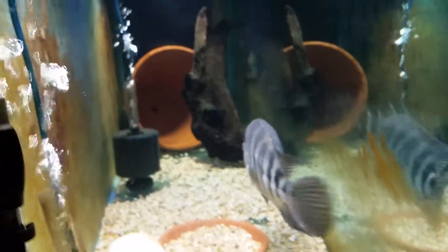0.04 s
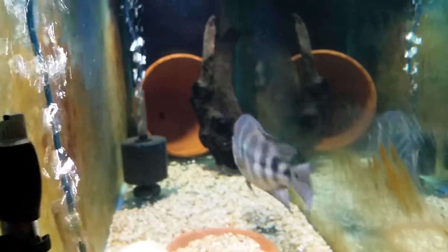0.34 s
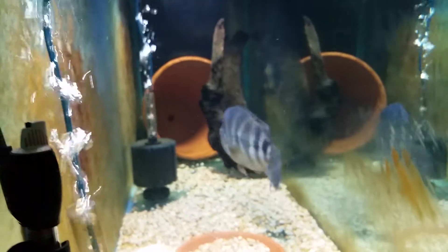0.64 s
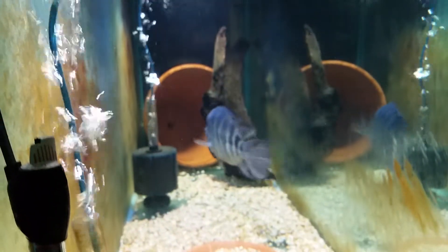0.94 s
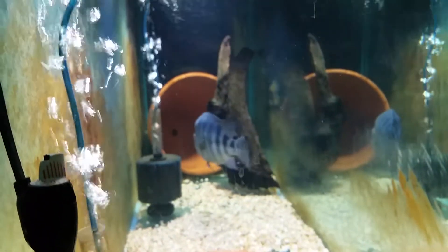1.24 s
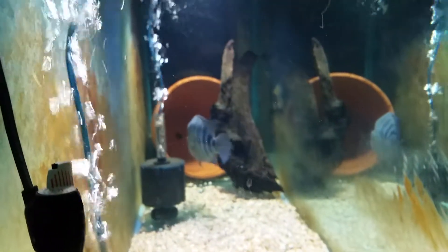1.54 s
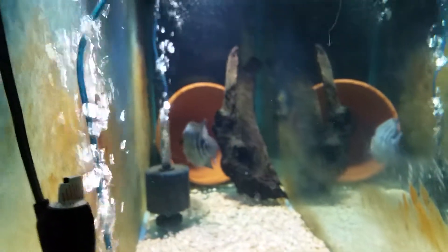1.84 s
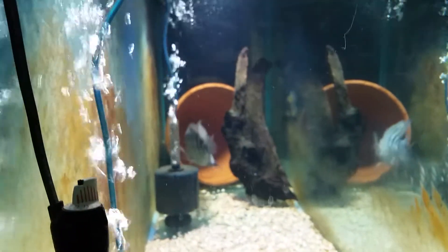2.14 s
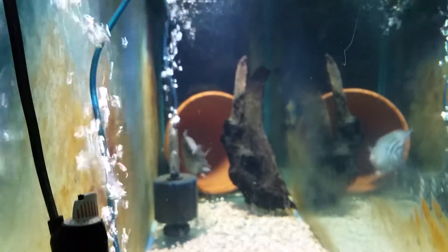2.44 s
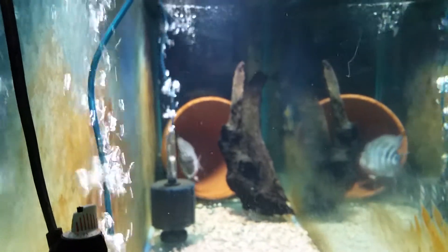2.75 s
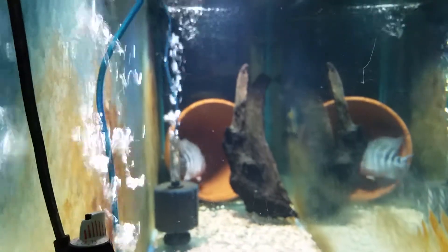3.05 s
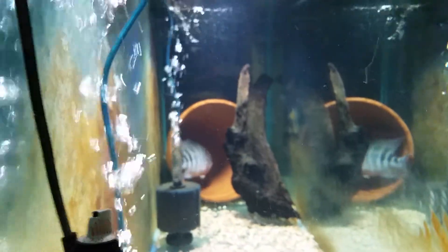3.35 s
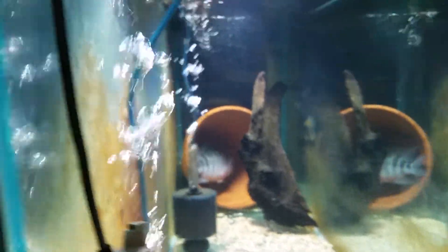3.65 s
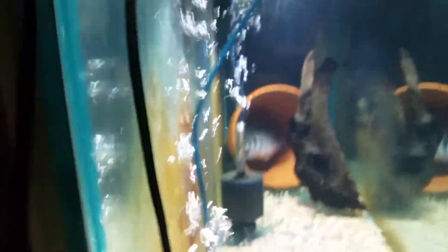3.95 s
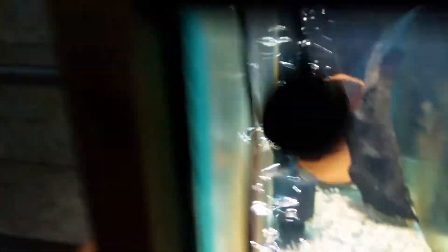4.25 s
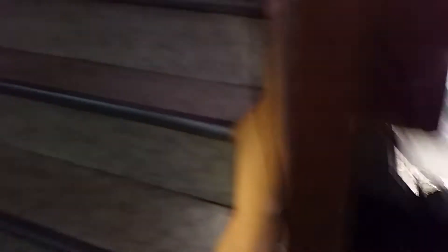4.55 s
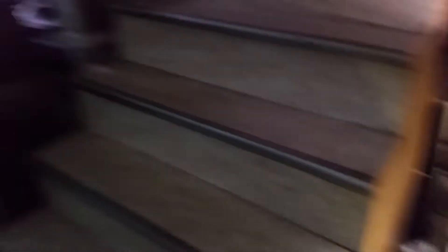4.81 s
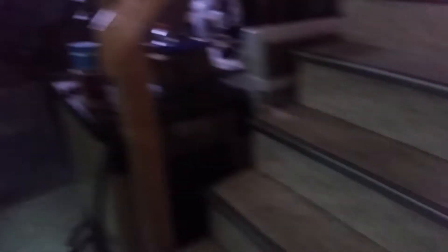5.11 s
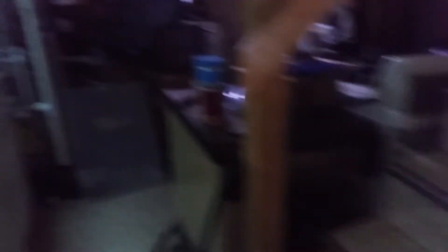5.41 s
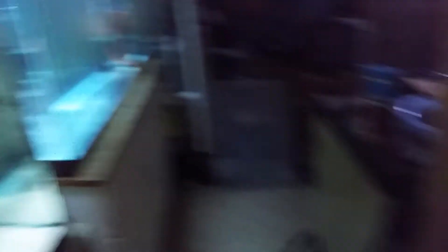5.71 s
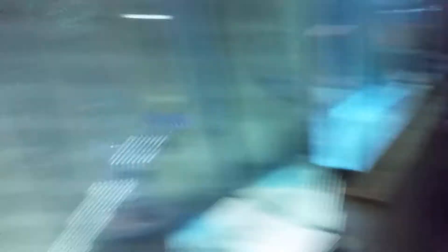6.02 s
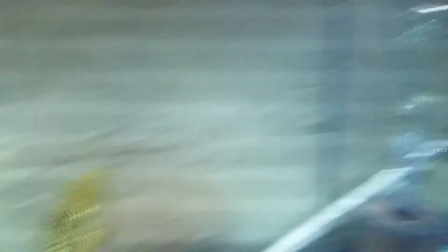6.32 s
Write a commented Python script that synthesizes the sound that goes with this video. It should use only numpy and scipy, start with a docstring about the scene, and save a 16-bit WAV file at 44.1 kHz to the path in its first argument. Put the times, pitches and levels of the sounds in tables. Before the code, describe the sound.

Bubbles gurgle and rumble in aquariums over humming air pumps, with wind puffs on the microphone and light handling noise.

```python
"""Bubbles rise through aquariums in a fish room, ringing as they burst and making the tanks rumble.
Diaphragm air pumps hum at the mains rate, over a soft hiss of air and filters.
A hand-held microphone stands by one tank, where a draught buffets it, then turns into the aisle.
Fingers tick and rub on its case, and near the end the hand slides to a new grip."""
import sys
import numpy as np
from scipy import signal
from scipy.fft import rfft, irfft
from scipy.io import wavfile
from scipy.ndimage import map_coordinates

SR = 44100
rng = np.random.default_rng(int(sys.argv[2]) if len(sys.argv) > 2 else 0)


def master_out(mix):
    """Clip the mix to full scale and print it as 16-bit PCM to the path in sys.argv[1]."""
    frames = np.transpose(np.atleast_2d(mix))
    ceiling = np.clip(frames, -1, 1)
    pcm = np.round(ceiling * 32767).astype(np.int16)
    wavfile.write(sys.argv[1], SR, pcm)


N = 285470
T = np.arange(N) / SR
FREQS = np.maximum(np.arange(N // 2 + 1) * SR / N, 1)
MAINS_HZ = 60

# Levels are in decibels; most tables set how loud each sound is, and some functions add a gain.
# the microphone's turn: time_s, aisle_share (0 at the tank, 1 in the aisle)
TURN = [(0, 0), (1.8, 0.02), (3.85, 0), (4.25, 0.45), (5.2, 1), (6.47, 0.73)]

# tone of the air and filter hiss: pitch_hz, left_db, right_db
HISS_COLOUR = [(740, -93, -81), (950, -87, -78.5), (2010, -90, -81), (2294, -93.5, -89.5),
               (2640, -104.0, -103.0), (3410, -103.4, -105.6), (3796, -86.5, -101.3), (4240, -90.5, -102.5),
               (4700, -104.0, -107.9), (5760, -125.0, -121.6), (7400, -130.0, -129.6),
               (9550, -134.4, -134.3), (11970, -115.6, -116.1), (15200, -110.3, -108.6)]
# the hiss dips a little in the aisle: time_s, level_db
HISS_LEVEL = [(0, 0.4), (2, 0.13), (4.4, 0.63), (5.2, 0.2), (5.75, -1.6), (6.05, -0.3), (6.47, 0.4)]
# the draught, strongest by the tank: time_s, left_db, right_db
DRAUGHT_LEVEL = [(0, -40.5, -40), (1.5, -41, -43), (2.5, -38.5, -36.5), (2.8, -36, -30), (3.7, -40, -32),
                 (4.1, -36, -38.5), (4.4, -49.5, -55.5), (6.47, -48.5, -54)]
# tone of its swirling air: pitch_hz, level_db
DRAUGHT_COLOUR = [(10, -26.5), (25, -9.5), (45, -1), (70, 2), (110, 0), (170, -6), (250, -17), (400, -29),
                  (800, -51), (3000, -100)]
# puffs of air hit the microphone: middle_s, length_s, left_db, right_db
PUFFS = [(0.323, 0.04, -30.5, -29), (0.45, 0.047, -27, -34), (0.775, 0.046, -32.5, -22),
         (0.835, 0.04, -29.5, -32.5), (1.07, 0.037, -30, -38), (1.395, 0.075, -36, -24.5),
         (1.655, 0.055, -42, -24), (1.795, 0.091, -36, -22), (1.92, 0.035, -22.5, -28),
         (2.054, 0.071, -38, -23.5), (2.225, 0.067, -35, -25), (2.502, 0.034, -32, -30),
         (2.762, 0.04, -29, -25.5), (2.83, 0.038, -40, -19.5), (2.998, 0.025, -35, -22),
         (3.12, 0.063, -39.5, -24), (3.213, 0.06, -34.5, -16), (3.296, 0.037, -25, -22.5),
         (3.452, 0.05, -38.5, -24.5), (3.392, 0.036, -42, -21.5), (3.599, 0.035, -40, -14),
         (3.838, 0.061, -24.5, -19), (4.037, 0.032, -40, -29)]

# fingers tick on the case: middle_s, level_db, half_width_s
TICKS = [(4.1026, -13, .00031), (4.807, -17.2, .00029), (5.3375, -11, .00031), (6.2868, -18.5, .0003)]
# the case creaks faintly: start_s, level_db
CREAKS = [(4.807, -46), (4.821, -50), (5.228, -45), (5.232, -41), (5.236, -44), (6.288, -36)]
# a finger rubs the case: start_s, length_s, level_db
RUB = (3.835, 0.022, -32.5)
# the hand slides to a new grip: start_s, length_s
SLIDE = (6.05, 0.24)
# a high, airy sound in mid-slide: middle_s, half_width_s
SHEEN = (6.13, 0.13)
# tones of the rub and of the slide's scrape, swish and sheen: pitch_hz, level_db
RUB_COLOUR = [(40, 3), (120, 0), (500, -3), (1000, -12), (1500, -17), (2100, -16), (2700, -23),
              (3700, -16.5), (4400, -19), (5400, -54), (9000, -68)]
SCRAPE_COLOUR = [(200, 5.5), (600, 5.5), (900, -4), (1350, 0.5), (1700, -2), (2200, -0.5), (2900, -27),
                 (4000, -17), (5600, -60), (9000, -76)]
SWISH_COLOUR = [(200, -20), (600, -2), (2300, -2), (3050, -4), (3500, 1), (4200, -1), (5500, -20),
                (7000, -27), (9500, -30), (11200, -21), (15000, -20)]
SHEEN_COLOUR = [(9800, -30), (11200, -3), (14300, 0), (15500, -2)]
# the sliding skin catches on the case: start_s, level_db
CATCHES = [(6.026, -36), (6.092, -36)]
# the skin squeaks as the slide ends: start_s, length_s, pitch_hz, width_hz
SQUEAK = (6.13, .13, 2760, 300)
# the hand bumps the case: start_s, level_db
BUMPS = [(5.338, -35), (6.031, -19.5), (6.144, -32)]
# the bumped case sways in the hand: pitch_hz, level_db, ring_cycles
BUMP_TONES = [(52.5, 2.5, 16), (135, -4.5, 11), (212, -3.5, 23)]

# tones of the pumps: mains_multiple, tank_left_db, tank_right_db, aisle_left_db, aisle_right_db
HUM_TONES = [(1, -48.0, -49.0, -51.0, -46.0), (2, -46.0, -42.7, -43.8, -39.8),
             (3, -43.0, -39.5, -47.0, -42.0), (4, -57.0, -50.0, -60.0, -52.0),
             (5, -59.0, -55.0, -54.0, -50.0), (6, -51.3, -46.5, -59.0, -52.0),
             (7, -68.0, -55.0, -66.0, -63.0), (9, -70.0, -58.0, -65.0, -60.0),
             (10, -65.0, -63.0, -60.5, -54.7), (11, -66.0, -62.0, -73.0, -64.0),
             (12, -68.0, -61.0, -76.0, -67.0), (13, -65.0, -71.0, -77.0, -71.0),
             (14, -68.0, -62.0, -74.0, -75.0), (17, -66.0, -61.5, -74.0, -63.5),
             (23, -74.0, -61.0, -80.0, -72.0), (26, -84.0, -72.0, -82.0, -69.0),
             (29, -75.0, -66.5, -80.0, -75.0)]
# loud and quiet spots the microphone crosses: mains_multiple, middle_s, half_width_s, change_db
HUM_SPOTS = [(1, 6.1, .65, -12), (2, 6.05, .6, -11), (3, 0.55, .2, 2), (3, 3.35, .25, 3),
             (3, 6.15, .55, -8), (4, 6.1, .65, -6), (6, 0.42, .08, 4), (6, 0.97, .09, 6), (6, 2.05, .1, 3),
             (6, 4.6, .2, -12), (6, 6.05, .4, 4), (10, 4.0, .08, -10), (10, 4.32, .2, 6.5),
             (10, 4.8, .18, 3), (10, 5.07, .1, -11), (10, 5.65, .27, 3.5), (10, 6.1, .1, -4),
             (10, 6.35, .12, 2.5), (17, 4.42, .12, 6), (17, 5.0, .45, -4), (17, 5.95, .3, 5.5),
             (23, 4.3, .35, -5), (23, 5.5, .17, 14)]

# tones at which the tanks and room ring: pitch_hz, width_hz, tank_db, aisle_db
TANK_TONES = [(69, 18, -46, -45.5), (107.8, 14, -46, -44.5), (129.2, 35, -46, -43), (168.2, 31.3, -44, -49),
              (224, 66, -47, -49), (266.4, 37.3, -43.5, -50), (294.1, 38, -47, -48), (350, 81, -49, -50),
              (404.6, 14, -51, -55.5), (447.5, 89, -57, -54), (476.4, 30, -61, -65), (812.5, 72, -59, -72)]
# boom of the churning water: pitch_hz, level_db
CHURN_COLOUR = [(15, -93.5), (30, -63), (55, -65.5), (100, -61.5), (200, -66.5), (300, -76.5), (450, -79.5),
                (600, -80), (800, -90), (1200, -100), (2500, -160)]
# a big gulp of air at the surface: start_s, length_s, start_hz, end_hz
GULP = (.331, .036, 520, 1040)
# single big bubbles plop: start_s, pitch_hz, level_db
PLOPS = [(0.366, 410, -32), (1.967, 294.5, -24), (2.595, 267, -26.5), (2.622, 800, -38), (2.825, 270, -27),
         (3.19, 239, -26), (3.447, 672, -36), (6.14, 496, -36)]


def from_db(db):
    """Turn decibels into a gain."""
    return 10 ** (np.asarray(db) / 20)


def unit_power(x):
    """Scale each channel to an average power of 1."""
    return x / np.sqrt(np.mean(x ** 2, axis=-1, keepdims=True) + 1e-20)


def in_time(rows):
    """Draw one curve over time for each value column of a table."""
    times, *columns = np.transpose(rows)
    return np.array([np.interp(T, times, column) for column in columns])


def coloured(white, colour):
    """Shape white noise with a table of pitches and levels."""
    hz, *columns = np.transpose(colour)
    gain = from_db([np.interp(np.log(FREQS), np.log(hz), column) for column in columns])
    return irfft(rfft(white) * gain, N) * np.sqrt(SR / 2)


def noise_pair(likeness):
    """Left and right white noise: likeness 0 is unrelated, 1 is the same."""
    mid, side = rng.standard_normal((2, N))
    return (np.sqrt(1 + likeness) * mid + np.sqrt(1 - likeness) * np.array([side, -side])) / np.sqrt(2)


def stereo_noise(colour, likeness=0):
    """Shaped left and right noise with a power of 1."""
    return unit_power(coloured(noise_pair(likeness), colour))


def drift(per_s):
    """A smooth curve through per_s random values a second, mostly within -1 to 1."""
    points = rng.standard_normal(2000)
    coarse = map_coordinates(points, [T[::50] * per_s + 5], order=3, mode="wrap")
    return np.interp(T, T[::50], coarse)


def cut(x, kind, hz, order):
    """Keep only the "low" or the "high" side of a pitch."""
    return signal.sosfilt(signal.butter(order, hz, kind, fs=SR, output="sos"), x + 1e-18)


def resonate_twice(x, hz, width_hz):
    """Ring a sound twice at one pitch, leaving a narrow band with a power of 1."""
    radius = np.exp(-np.pi * width_hz / SR)
    feed = np.array([1, 0, -1]) * (1 - radius ** 2) / 2
    feedback = [1, -2 * radius * np.cos(2 * np.pi * hz / SR), radius ** 2]
    for _ in range(2):
        x = signal.lfilter(feed, feedback, x + 1e-18)
    return unit_power(x)


def clicks(per_s, spread_db):
    """Clicks at random moments, a few much bigger than the rest."""
    sizes = from_db(spread_db * np.minimum(rng.exponential(1, N), 4))
    signs = rng.choice([-1, 1], N)
    return sizes * signs * (rng.random(N) < per_s / SR)


def ring(hz, cycles, rise=0):
    """A tone that fades 60 dB over some cycles; rise lifts its pitch, like a bubble nearing the top."""
    age = np.arange(int(1.5 * SR * cycles / hz) + 2) * hz / (SR * cycles)
    tone = np.sin(2 * np.pi * cycles * age * (1 + rise * age / 2))
    onset = 1 - np.exp(-2 * cycles * age)
    return tone * onset * from_db(-60 * age)


def stroke(start_s, length_s, rise_db_per_s, fall_db_per_s):
    """A gain that swells until start_s, holds for length_s and dies away."""
    before_s = np.maximum(start_s - T, 0)
    after_s = np.maximum(T - start_s - length_s, 0)
    return from_db(-rise_db_per_s * before_s - fall_db_per_s * after_s)


def bell(middle_s, half_width_s):
    """A smooth hill of height 1 around a moment."""
    return np.exp(-np.minimum(((T - middle_s) / half_width_s) ** 2, 50))


def add(out, start_s, sound):
    """Mix a sound in at a given time."""
    start = int(np.clip(start_s * SR, 0, N - 1))
    out[start:start + len(sound)] += sound[:N - start]


def hiss():
    """Air and filters hiss evenly from all around."""
    air = coloured(noise_pair(0), HISS_COLOUR)
    return cut(air, "high", hz=460, order=2) * from_db(in_time(HISS_LEVEL)[0])


def draught(flow_gain_db, puff_gain_db, flutter_db):
    """Air swirls at each side of the microphone; puffs ride on a fluttering flow."""
    flutter = flutter_db * np.array([drift(10), drift(25)])
    power = from_db(in_time(DRAUGHT_LEVEL) + flow_gain_db + flutter) ** 2
    for middle_s, length_s, left_db, right_db in PUFFS:
        strength = from_db([[left_db], [right_db]]) * from_db(puff_gain_db)
        power += strength ** 2 * bell(middle_s, 0.47 * length_s)
    return stereo_noise(DRAUGHT_COLOUR, likeness=0.017) * np.sqrt(power)


def finger_rub():
    """A finger brushes the case in one short burst of noise."""
    start_s, length_s, level_db = RUB
    friction = unit_power(coloured(rng.standard_normal(N), RUB_COLOUR))
    return friction * from_db(level_db) * stroke(start_s, length_s, rise_db_per_s=3000, fall_db_per_s=2200)


def finger_ticks():
    """Each tick is a push of pressure that leaks away; the plastic creaks with a short, muffled ring."""
    pulses = sum(from_db(db) * bell(s, np.sqrt(2) * width_s) for s, db, width_s in TICKS)
    creaks = np.zeros(N)
    for start_s, level_db in CREAKS:
        add(creaks, start_s, from_db(level_db) * ring(hz=3350, cycles=17))
    return cut(pulses, "high", hz=200, order=1) + cut(creaks, "low", hz=4380, order=4)


def hand_slide(scrape_db, swish_db, sheen_db):
    """The sliding hand makes a scrape that catches twice, a smooth swish and an airy sheen."""
    speed = stroke(*SLIDE, rise_db_per_s=95.5, fall_db_per_s=95)
    catches = sum(from_db(db) * stroke(s, 0.0024, rise_db_per_s=1796, fall_db_per_s=695)
                  for s, db in CATCHES)
    scrape = (from_db(scrape_db) * speed ** 2.8 + catches) * stereo_noise(SCRAPE_COLOUR)
    scrape *= from_db([[-6], [0]])  # weaker on the left
    swish = from_db(swish_db) * speed * stereo_noise(SWISH_COLOUR)
    sheen = from_db(sheen_db) * bell(*SHEEN) * stereo_noise(SHEEN_COLOUR)
    return scrape + swish + sheen


def skin_squeak(level_db):
    """Quick, uneven slips of the skin ring one tone of the case."""
    start_s, length_s, hz, width_hz = SQUEAK
    slips = np.array([clicks(per_s=1500, spread_db=2.5), clicks(per_s=1500, spread_db=2.7)])
    ringing = resonate_twice(slips, hz, width_hz) * from_db(level_db + drift(60))
    return ringing * stroke(start_s, length_s, rise_db_per_s=300, fall_db_per_s=600)


def case_bumps():
    """Each bump sets the case swaying with a few low tones."""
    out = np.zeros(N)
    for start_s, level_db in BUMPS:
        for hz, tone_db, cycles in BUMP_TONES:
            add(out, start_s, from_db(level_db + tone_db) * ring(hz, cycles))
    return out


def handling():
    """Fingers work on the microphone's left side; the change of grip shakes the whole case."""
    fingers = (finger_rub() + finger_ticks()) * from_db([[0], [-29]])
    slide = hand_slide(scrape_db=-47, swish_db=-59.5, sheen_db=-63)
    return fingers + slide + skin_squeak(level_db=-62.5) + case_bumps()


def hum_spots(multiple):
    """Gain of one hum tone as the microphone crosses places where its echoes add up or cancel."""
    return from_db(sum(db * bell(s, width_s) for tone, s, width_s, db in HUM_SPOTS if tone == multiple))


def pumps(aisle, gain_db, waver_db):
    """Pumps hum at multiples of the mains rate; each tone wavers as the microphone moves."""
    out = np.zeros((2, N))
    for multiple, *levels_db in HUM_TONES:
        hz = MAINS_HZ * multiple
        at_tank, in_aisle = from_db(levels_db).reshape(2, 2, 1)
        shortness = hz / (hz + 200)  # long waves change little from place to place
        level = (at_tank * (1 - aisle) + in_aisle * aisle) * hum_spots(multiple)
        level *= from_db(waver_db * shortness * drift(6.4))
        phase = 2 * np.pi * (hz * T + rng.random())
        phase += 0.43 * drift(2.183) + 0.38 * shortness * drift(16)  # slow sway, quick flutter
        # short waves differ more between left and right
        left_shift = 0.65 * hz / 1000 * (1 + 0.14 * drift(0.98))
        out += np.sqrt(2) * level * np.sin([phase - left_shift, phase])
    return from_db(gain_db) * out


def to_the_right(sound, pan_db, lag_s):
    """A sound on the right reaches the left side weaker and lag_s later."""
    left, right = sound
    late_left = np.interp(T - lag_s, T, left)
    return np.array([late_left * from_db(-pan_db / 2), right * from_db(pan_db / 2)])


def tank_rumble(aisle):
    """Bubbles leave the air stones and burst, ringing glass and room in turn over a dull boom."""
    out = np.zeros(N)
    for hz, width_hz, tank_db, aisle_db in TANK_TONES:
        bursts = clicks(per_s=500, spread_db=4.5)
        out += resonate_twice(bursts, hz, width_hz) * from_db(tank_db + (aisle_db - tank_db) * aisle)
    return out + coloured(noise_pair(likeness=0.7), CHURN_COLOUR)


def burble(gain_db, low_hz, high_hz, count):
    """Crowds of small bubbles blend at the surface; the smaller, the higher and fainter."""
    out = np.zeros(N)
    for when, smallness, strength in rng.random((count, 3)):
        hz = low_hz * (high_hz / low_hz) ** smallness
        add(out, when * N / SR, ring(hz, cycles=14, rise=0.2) * low_hz / hz * strength)
    return from_db(gain_db) * unit_power(out)


def pips(gain_db, low_hz, high_hz, spread_db, count):
    """Small bubbles burst alone and stand out from the crowd."""
    out = np.zeros(N)
    for when, smallness, weakness in rng.random((count, 3)):
        hz = low_hz * (high_hz / low_hz) ** smallness
        strength = np.sqrt(low_hz / hz) * from_db(gain_db - spread_db * weakness)
        add(out, when * N / SR, strength * ring(hz, cycles=36, rise=0.12))
    return out


def gulp(gain_db, scatter, count):
    """A pocket of air breaks into bubbles that tend to get smaller and higher."""
    start_s, length_s, start_hz, end_hz = GULP
    out = np.zeros(N)
    for k, (delay, size) in enumerate(rng.random((count, 2))):
        progress = (k + delay / 2) / count
        hz = (start_hz + (end_hz - start_hz) * progress) * np.exp(-scatter * size ** 2)
        add(out, start_s + progress * length_s, ring(hz, cycles=25, rise=0.037))
    return from_db(gain_db) * out


def plops():
    """Each big bubble rings briefly, rising in pitch."""
    out = np.zeros(N)
    for start_s, hz, level_db in PLOPS:
        add(out, start_s, from_db(level_db) * ring(hz, cycles=40, rise=0.12))
    return out


def scene():
    """Water and pumps lie to the right; draught and fingers act on the microphone itself."""
    aisle = in_time(TURN)[0]
    water = tank_rumble(aisle) + plops()
    water += burble(gain_db=-54, low_hz=400.7, high_hz=1520, count=5000)
    water += gulp(gain_db=-35.5, scatter=0.5, count=12)
    water += pips(gain_db=-42.5, low_hz=680, high_hz=2200, spread_db=12, count=130)
    # turning away shrinks the lag, bringing the water toward the middle
    water = to_the_right(water, pan_db=4.8, lag_s=0.00026 * (1 - 1.1 * aisle))
    hum = pumps(aisle, gain_db=1.15, waver_db=2.2)
    air = hiss() + draught(flow_gain_db=1.9, puff_gain_db=-0.45, flutter_db=0.5)
    return water + hum + air + handling()


def record(dry):
    """Cut away the very highest treble."""
    cutoff_hz = 15550
    return signal.sosfilt(signal.ellip(10, .1, 90, cutoff_hz, fs=SR, output="sos"), dry)


dry = scene()
out = record(dry)
master_out(out)
```